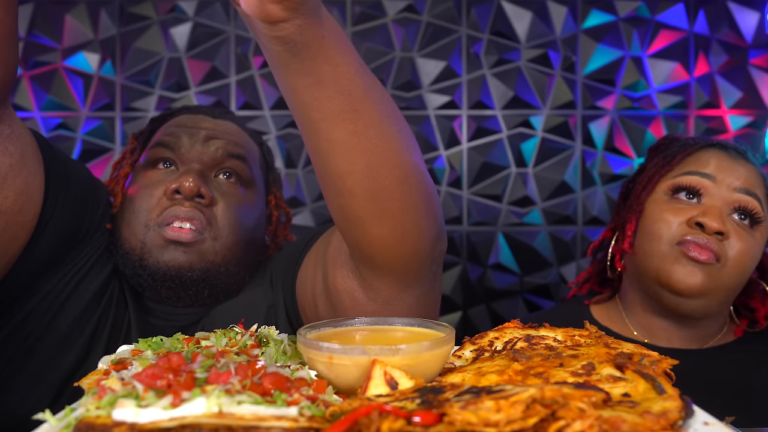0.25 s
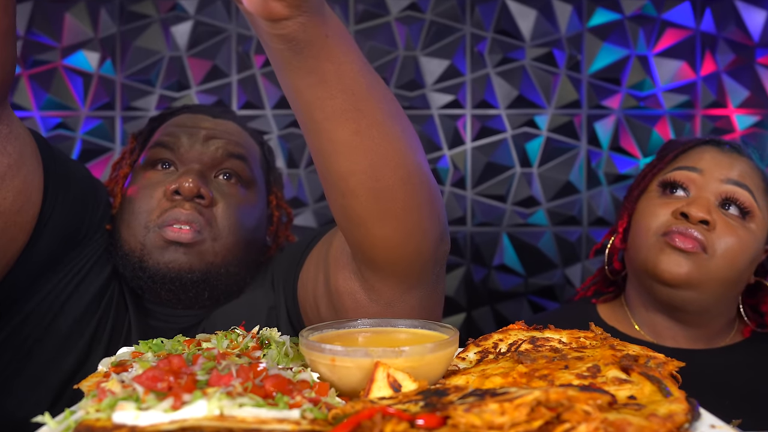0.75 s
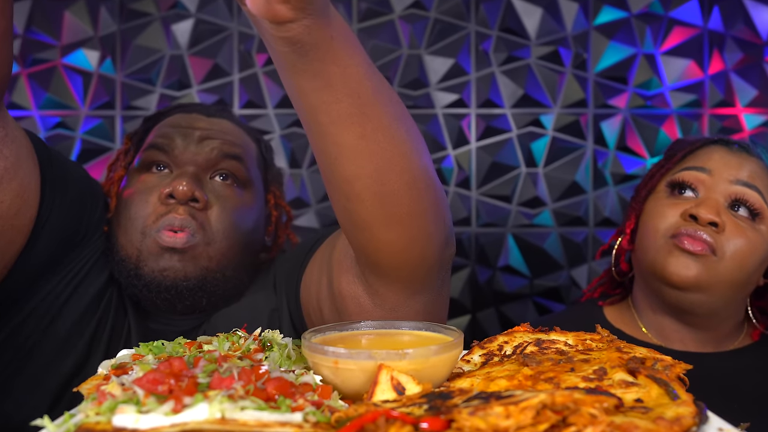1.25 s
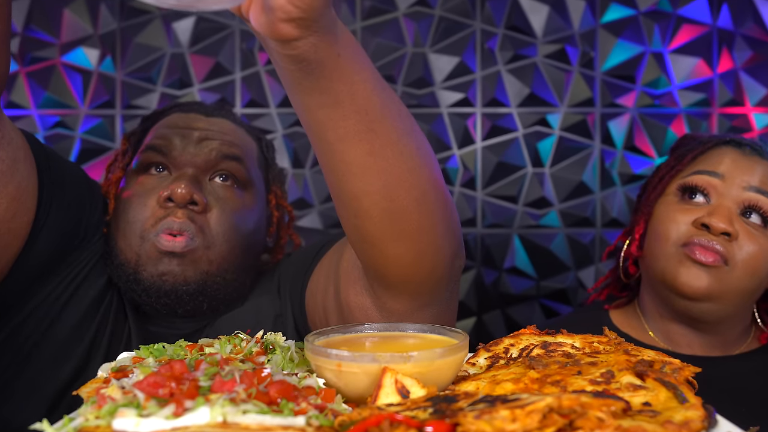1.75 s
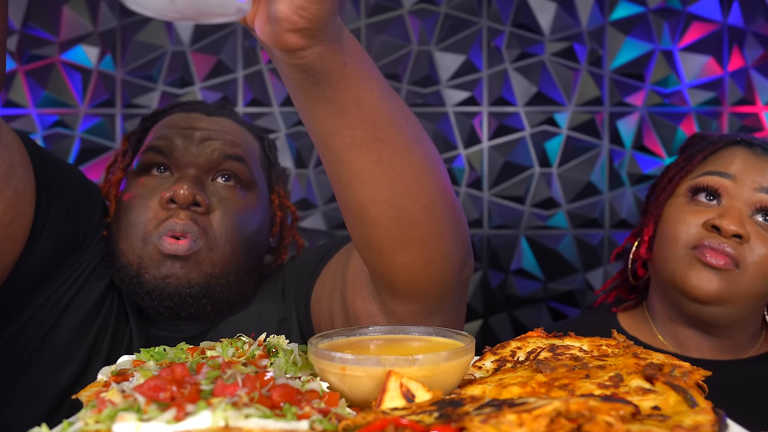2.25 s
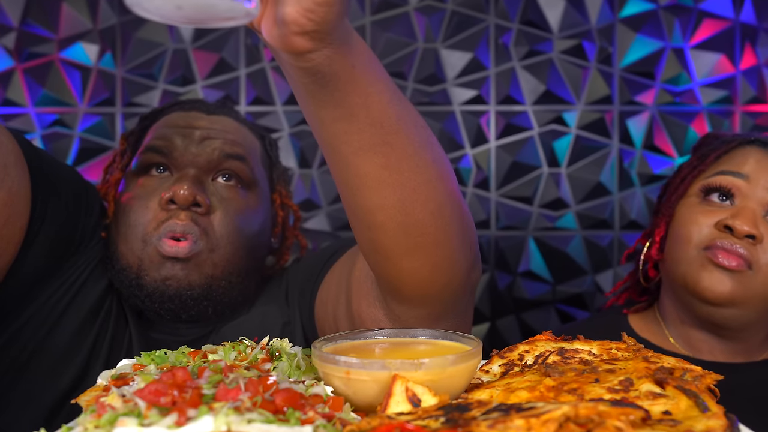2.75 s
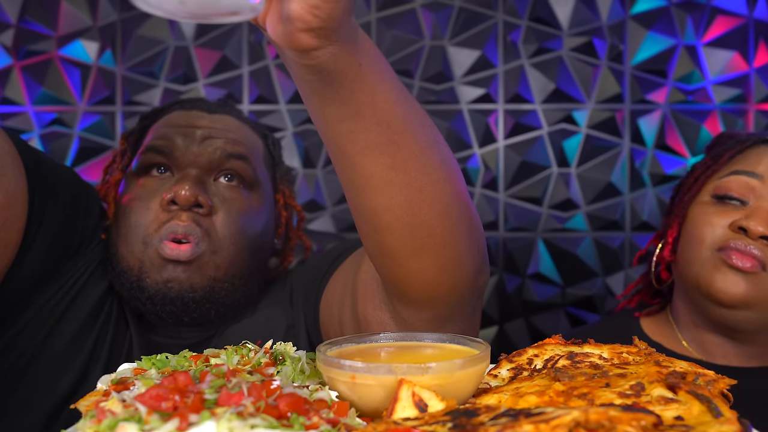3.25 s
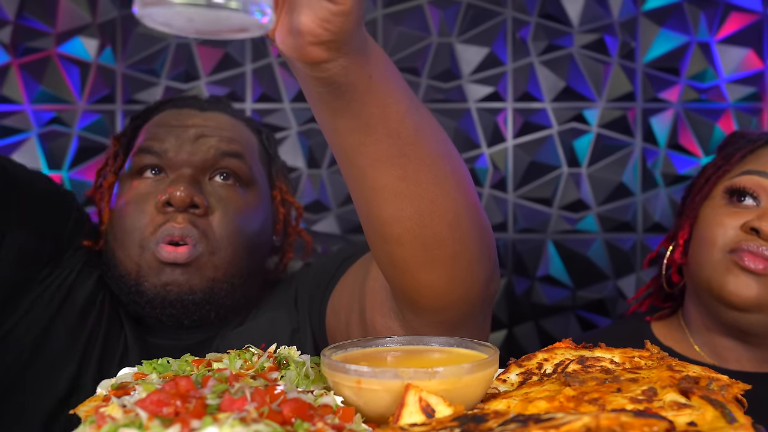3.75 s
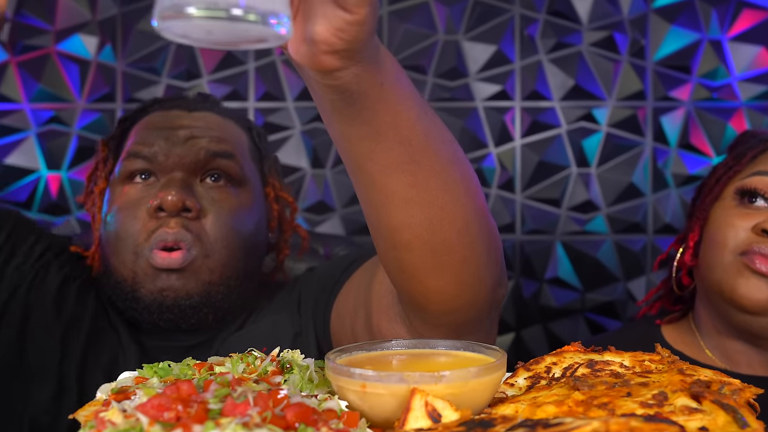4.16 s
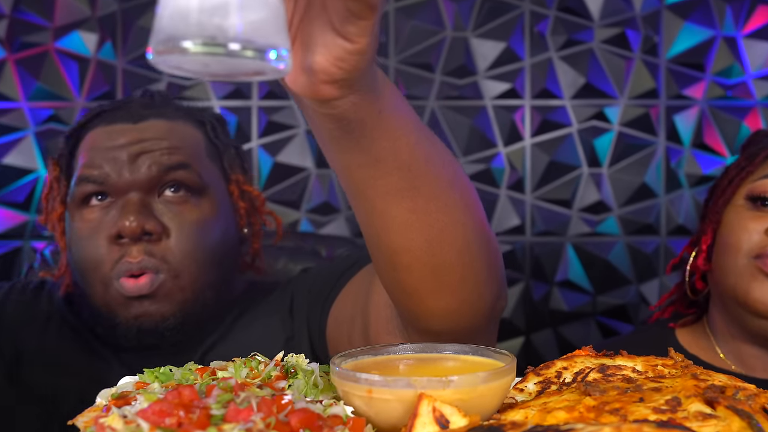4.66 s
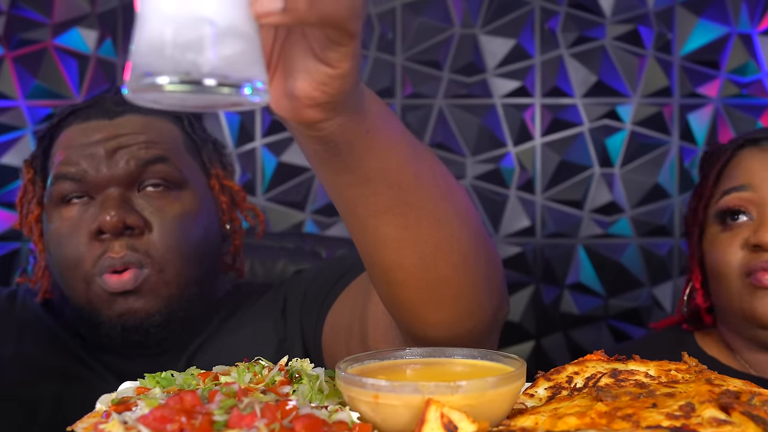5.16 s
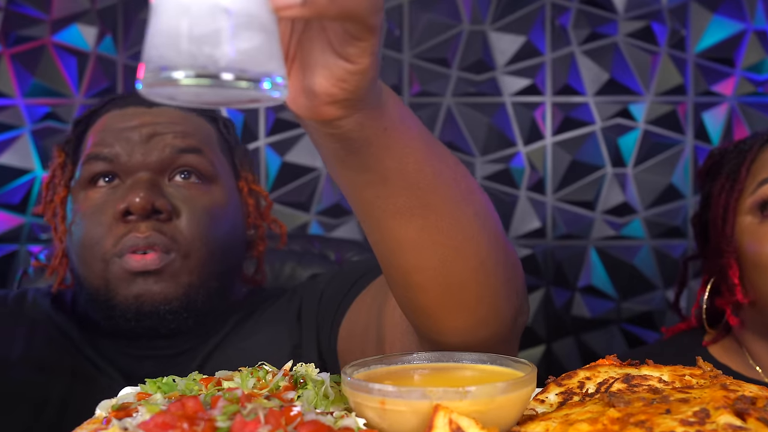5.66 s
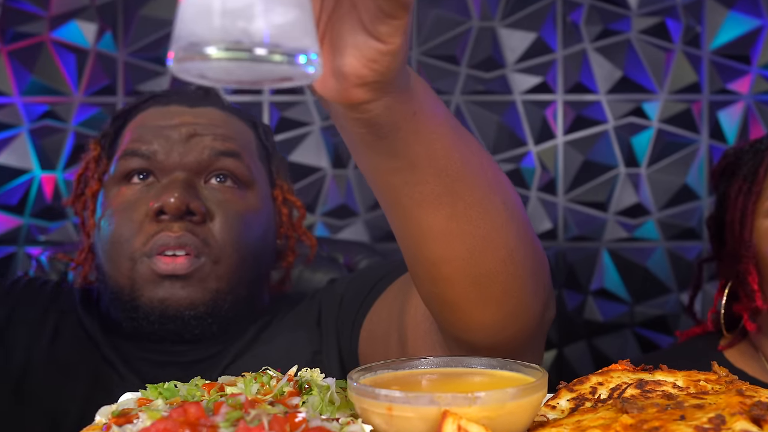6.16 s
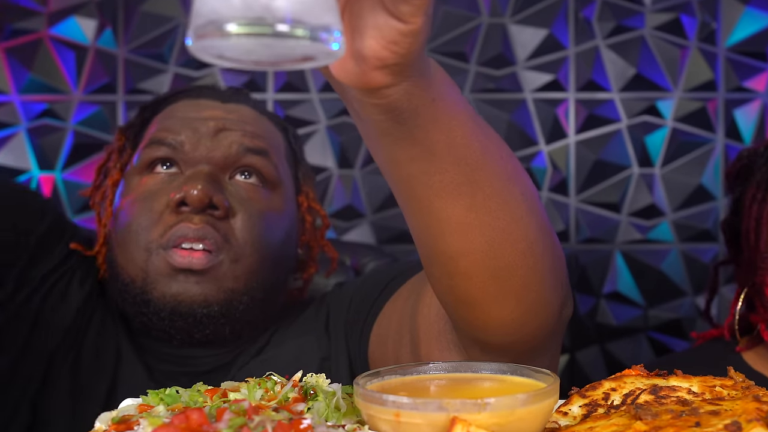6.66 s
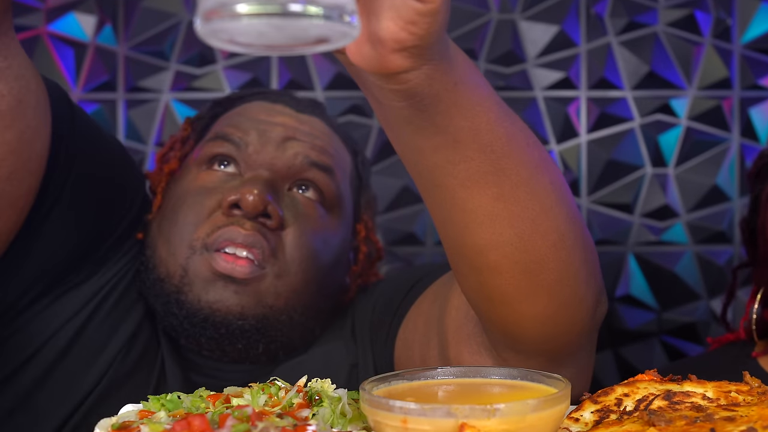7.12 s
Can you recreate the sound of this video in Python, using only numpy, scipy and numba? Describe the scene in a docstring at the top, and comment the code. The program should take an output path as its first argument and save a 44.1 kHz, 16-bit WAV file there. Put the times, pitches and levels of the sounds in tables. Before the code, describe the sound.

A carbonated drink fizzes over ice in a glass, heard very close and dry in a small room with faint low hum. Bright, dense hiss and crackle begin at once, with a tiny slosh and several ice ticks in the first 0.15 s. The fizz dips briefly, then swells back by 0.4 s; a crisp ice snap comes at 0.55 s. Soft low hand bumps cluster from 1.4 to 2.0 s. Around 3.2 to 3.6 s trapped bubbles glug with rising pitch, ending in a short ice clink. The bubbling gradually coarsens, its hollow tone rising until 4.5 s, then sinking. At 5.27 s a hard, sharp knock cracks and rings the glass, with quick rebounds, a dull shudder and low glugs near 5.4 to 5.5 s. Slightly softer fizz continues, with a faint tick at 6.95 s and a small slosh from about 7.2 s to the end at 7.4 s.

```python
"""Fizzy drink over ice.

A drink foams in a glass close to one microphone in a small room: thousands of bubble bursts a second
excite a fine spray, a bubble chorus that sinks in pitch and an air column that rises, then sinks back.
Damped sines make ice ticks, a clink, hand bumps and large-bubble glugs; liquid churns in low noise.
One hard knock rings the glass modes, with softer rebounds, a noise crack and a dull shudder."""
import sys
import numpy as np
from scipy import signal
from scipy.fft import rfft, irfft, next_fast_len
from scipy.io import wavfile
from scipy.ndimage import uniform_filter1d
from numba import njit

SR = 44100
rng = np.random.default_rng(int(sys.argv[2]) if len(sys.argv) > 2 else 0)


def int16_out(signal):
    """Quantize to a 16-bit WAV file."""
    q = np.round(np.clip(np.atleast_2d(signal).T, -1, 1) * 32767)
    wavfile.write(sys.argv[1], SR, q.astype(np.int16))


N = 325899
TIME = np.arange(N) / SR


def undb(db):
    """Decibels to amplitude gain."""
    return 10 ** (np.asarray(db) / 20)


def unit(x):
    """Scale to rms 1."""
    return x / np.sqrt(np.mean(x ** 2))


def curve(rows):
    """Join (time_s, level_db) points by straight lines over the scene."""
    time_s, level_db = np.transpose(rows)
    return np.interp(TIME, time_s, level_db)


def colour(x, points):
    """Filter by (freq_hz, gain_db) points, linear in log frequency; rms 1."""
    freq_hz, gain_db = np.transpose(points)
    size = next_fast_len(N)
    bin_hz = np.maximum(np.arange(size // 2 + 1) * SR / size, 1)
    gain = undb(np.interp(np.log(bin_hz), np.log(freq_hz), gain_db))
    return unit(irfft(rfft(x, size) * gain, size)[:N])


def walk(rate_hz):
    """Random levels held 1 / rate_hz seconds, smoothed twice; rms 1."""
    hold = max(int(SR / rate_hz), 2)
    held = np.repeat(rng.standard_normal(N // hold + 1), hold)[:N]
    return unit(uniform_filter1d(uniform_filter1d(held, hold), hold))


@njit
def resonance(x, hz, width):
    """State-variable band-pass with a moving centre; width is a share of the centre."""
    out, band_state, low_state = np.empty(len(x)), 0., 0.
    for i in range(len(x)):
        g = np.tan(np.pi * hz[i] / SR)
        v = (band_state + g * (x[i] - low_state)) / (1 + g * (g + width))
        band_state = 2 * v - band_state
        low_state = low_state + 2 * g * v
        out[i] = width * v
    return out


def band(x, hz, width, order=3):
    """Cascade resonances into a steep moving band; rms 1."""
    for _ in range(order):
        x = resonance(x, hz, width)
    return unit(x)


def highpass(x, hz):
    """Second-order Butterworth high-pass."""
    return signal.sosfilt(signal.butter(2, hz, "high", fs=SR, output="sos"), x)


def fade(t, t60_s):
    """Exponential decay of 60 dB in t60_s."""
    return np.exp(-np.log(1000) * t / t60_s)


def ring(hz, t60_s, glide_per_s=0):
    """One second of damped sine; pitch rises by the share glide_per_s of hz each second."""
    t = TIME[:SR]
    return np.sin(2 * np.pi * hz * t * (1 + glide_per_s * t / 2)) * fade(t, t60_s)


def modes(rows):
    """Sum damped sines from (freq_hz, level_db, t60_s) rows."""
    return sum(undb(db) * ring(hz, t60_s) for hz, db, t60_s in rows)


def add(out, start_s, sound):
    """Mix a sound in at start_s."""
    i = max(int(start_s * SR), 0)
    out[i:i + len(sound)] += sound[:N - i]


def swells(rows):
    """Sum Gaussian gain swells from (peak_s, half_length_s, level_db) rows."""
    return sum(undb(db) * np.exp(-((TIME - peak_s) / half_s) ** 2) for peak_s, half_s, db in rows)


def bursts(rate_per_s, spread_db):
    """Random impulses of either sign; exponential dB sizes, a negative spread makes a few weaker; rms 1."""
    happens = rng.random(N) < rate_per_s / SR
    size = undb(spread_db * np.minimum(rng.exponential(size=N), 5))
    return unit(happens * size * rng.choice([-1, 1], N))


def bubbles(rate_per_s, spread_db, count=9):
    """Bubbles of several sizes; each size bursts on its own and rings briefly at its pitch."""
    pitches_hz = np.geomspace(600, 14000, count)
    return sum(resonance(bursts(rate_per_s, spread_db), np.full(N, hz), 0.58) for hz in pitches_hz)


def room(air_db=-60, hum_db=1.5):
    """Sines wavering in phase and level make a faint hum over low room noise."""
    # hum partials, before hum_db: freq_hz, level_db
    partials = [(53.8, -75.5), (118.4, -68), (156.1, -72), (209.9, -65.5)]
    # room noise spectrum: freq_hz, gain_db
    air_colour = [(20, -20), (50, -8), (75, -14), (130, 0), (220, 0.5), (330, 3), (450, -3.5), (800, -26),
                  (3000, -49)]
    hum = np.zeros(N)
    for hz, db in partials:
        phase_rad = 2 * np.pi * hz * TIME + 1.96 * walk(7.6)
        hum += undb(db) * unit(np.sin(phase_rad) * undb(2.2 * walk(8.3)))
    return undb(hum_db) * hum + undb(air_db) * colour(rng.standard_normal(N), air_colour)


def churn(steady_db=-60.5):
    """Liquid moving between the cubes: low irregular plops, louder in each slosh."""
    # sloshes under the ice: peak_s, half_length_s, level_db
    sloshes = [(0.01, 0.03, -49), (1.4, 0.6, -73), (7.2, 0.28, -52.5), (7.33, .025, -45.5)]
    # plop spectrum: freq_hz, gain_db
    plop_colour = [(60, -16), (140, -3.5), (250, -1.5), (450, -9.5), (800, -5), (1500, -5), (4000, -47)]
    motion = undb(steady_db) + swells(sloshes)
    return colour(bursts(700, spread_db=0.5), plop_colour) * motion


def bumps(thud_hz=105, thud_t60_s=0.027, thud_db=-5):
    """Hand on the glass: a soft push, then the short low thud of the held glass."""
    # hand bumps: start_s, level_db, contact_s
    pushes = [(0.0602, -38, 0.0014), (0.123, -45, 0.0011), (1.4353, -36, 0.0032), (1.5845, -33, 0.0027),
              (1.614, -31, 0.0029), (1.633, -40, 0.0051), (1.6774, -33, 0.0029), (1.731, -39, 0.0018),
              (2.005, -33, 0.0016), (3.212, -44, .003)]
    out = np.zeros(N)
    for start_s, db, contact_s in pushes:
        add(out, start_s, undb(db) * np.hanning(int(contact_s * SR) + 3))
        add(out, start_s + contact_s, -undb(db + thud_db) * ring(thud_hz, thud_t60_s))
    return out


def glugs(swell_s=0.0038):
    """Trapped air breaks loose and rings higher as it nears the surface."""
    # large bubbles: start_s, level_db, pitch_hz, t60_s
    large_bubbles = [(3.212, -29, 426, 0.19), (3.29, -41, 463, 0.18), (3.474, -38, 545, 0.064),
                     (3.595, -25, 560, 0.065), (5.386, -36, 320, 0.14), (5.436, -31, 396, 0.54),
                     (5.528, -30, 239, 0.18)]
    onset = 1 - np.exp(-TIME[:SR] / swell_s)
    out = np.zeros(N)
    for start_s, db, hz, t60_s in large_bubbles:
        add(out, start_s, undb(db) * ring(hz, t60_s, glide_per_s=0.65) * onset)
    return out


def ice(snap_t60_s=0.006, splinter_db=-22.0, splinter_t60_s=0.025):
    """Cubes tick and snap as they crack and shift; one clinks with a splintery noise edge."""
    # ice ticks: start_s, level_db, pitch_hz, t60_s, snap_db (before the snap's high-pass)
    ticks = [(.060, -36, 420, .01, -50), (0.086, -29, 1160, 0.032, -44), (0.1228, -19.5, 1150, 0.0058, -35),
             (0.1237, -20.5, 2130, 0.009, -45), (0.1312, -28, 1400, .004, -40),
             (0.5523, -25.5, 1330, 0.011, -21), (3.399, -34, 600, 0.0086, -50),
             (6.953, -36, 350, 0.011, -42)]
    # modes of one cube, before clink_db and high-pass: freq_hz, level_db, t60_s
    cube_modes = [(1050, -29, 0.011), (1583, 0, 0.056), (1780, -1, 0.032), (1900, -19, 0.026),
                  (2440, -2, 0.05), (4000, -13, 0.088)]
    clink_s, clink_db = 3.5952, -21
    out = np.zeros(N)
    for start_s, db, hz, t60_s, snap_db in ticks:
        noise = rng.standard_normal(SR) * fade(TIME[:SR], snap_t60_s)
        snap = undb(snap_db) * highpass(noise, hz=3000)
        add(out, start_s, undb(db) * ring(hz, t60_s) + snap)
    # a cube is too small to radiate bass
    add(out, clink_s, undb(clink_db) * highpass(modes(cube_modes), hz=600))
    splinter = band(rng.standard_normal(N), np.full(N, 2000.), 1.3) * fade(TIME, splinter_t60_s)
    add(out, clink_s, undb(splinter_db) * splinter)
    return out


def knock(crack_db=-22, crack_t60_s=0.29, sing_db=-36, sing_t60_s=0.25):
    """A hard blow and softer rebounds ring the glass; a dense crack and a dull shudder go with them."""
    # glass and what holds it, before blow level and high-pass: freq_hz, level_db, t60_s
    glass_modes = [(113, -24, 0.47), (154.4, -3.5, 1), (216.7, 0.5, 0.46), (227.5, -2.5, 0.2),
                   (296, -2, 0.25), (328, -13, .3), (369, -7, 0.31), (393, 3.5, 0.24), (410, 1.5, 0.31),
                   (495, 0, 0.1), (531, 3, 0.19), (598, -2, 0.46), (717, -9, 0.3), (812, 3.5, 0.05),
                   (1000, -14, 0.15), (1420, -4.5, 0.083), (1825, -15, .12), (2940, -16, .08),
                   (3260, -19, 0.33), (3500, -13, 0.16)]
    # blow and rebounds: start_s, level_db, contact_s
    blows = [(5.2677, -23, 0.00013), (5.2749, -29.5, 0.0025), (5.3017, -29.5, 0.00069), (5.342, -45, .0002),
             (5.442, -44, .0004), (5.473, -41, 0.00096), (5.538, -42, 0.0014)]
    # crack spectrum: freq_hz, gain_db
    crack_colour = [(40, -22), (100, -8), (220, 10.5), (550, -1), (900, -8), (1400, -16), (2200, -16),
                    (3300, -8), (4100, -33), (6500, -18.5), (9000, -54)]
    # later swells of the shudder: peak_s, half_length_s, level_db
    shudder_swells = [(5.505, .06, -41), (5.72, .04, -56)]
    # shudder spectrum: freq_hz, gain_db
    shudder_colour = [(25, -4), (80, -18), (160, -18), (250, -3), (320, -0.5), (420, -0.5), (620, -5),
                      (760, -14), (1100, -18), (2500, -23.5), (6000, -58)]
    shudder_db, shudder_attack_s, shudder_t60_s = -27.5, .006, 1.11

    body, out = highpass(modes(glass_modes), hz=172), np.zeros(N)
    for start_s, db, contact_s in blows:
        push = np.hanning(int(contact_s * SR) + 3)  # a longer contact is duller
        add(out, start_s, undb(db) * np.convolve(body, push / push.sum()))

    knock_s = blows[0][0]
    crack = undb(crack_db) * colour(rng.standard_normal(N), crack_colour) * fade(TIME, crack_t60_s)
    # crowded high modes
    sing = band(rng.standard_normal(N), np.full(N, 3200.), 0.33) * fade(TIME, sing_t60_s)
    add(out, knock_s, crack + undb(sing_db) * sing)

    age_s = np.maximum(TIME - knock_s, 0)
    dying = undb(shudder_db) * (1 - np.exp(-age_s / shudder_attack_s)) * fade(age_s, shudder_t60_s)
    shudder = colour(rng.standard_normal(N), shudder_colour) * (dying + swells(shudder_swells))
    return out + shudder


def fizz(crackle_db=-10.5):
    """Bubble bursts heard as spray, lone crackles, a coarsening chorus and the air column over the foam."""
    # how hard the drink foams: time_s, level_db
    foaming = [(0, 1), (.18, -5), (.34, -6), (.43, -.5), (1.15, 0.5), (2.4, -0.5), (3.6, 1.5), (4.5, .3),
               (5.0, -2.5), (6.3, -2), (7.39, -1.5)]
    # level of the finest treble: time_s, level_db
    spray_level = [(0, -43), (2.3, -43), (3.6, -42.5), (5.4, -44), (6.4, -41.5), (7.39, -41.5)]
    # spectrum of the finest bursts: freq_hz, gain_db
    spray_colour = [(300, -2.5), (600, -5.5), (850, -1), (1500, 2), (3000, 4), (5000, 0), (6800, 1.5),
                    (8000, 0.5), (9000, 2), (10500, 0), (12000, 1.5), (15000, -2), (16000, -1)]
    # start levels at a foaming of 0 dB; ageing foam sings less and the air column takes over
    chorus_start_db, chorus_fade_db_per_s = -41, 1.0
    column_start_db, column_grow_db_per_s = -47.5, 0.2742
    # the typical bubble grows, so its pitch sinks
    fresh_bubble_hz, coarsen_oct_per_s = 4460, 0.12
    # rising foam shortens the air column, then the head sinks back
    column_start_hz, rise_hz_per_s, foam_peak_s, sink_hz_per_s = 1216, 207, 4.5, 160

    foaming_db, spray_db = curve(foaming), curve(spray_level)
    chorus_db = chorus_start_db + foaming_db - chorus_fade_db_per_s * TIME
    column_db = column_start_db + foaming_db + column_grow_db_per_s * TIME
    bubble_hz = fresh_bubble_hz * 2 ** (-coarsen_oct_per_s * TIME)
    rise_hz = rise_hz_per_s * np.minimum(TIME, foam_peak_s)
    sink_hz = sink_hz_per_s * np.maximum(TIME - foam_peak_s, 0)
    column_hz = column_start_hz + rise_hz - sink_hz
    rate_per_s = 15000 * np.exp(-TIME / 8)  # the foam slowly spends its gas

    spray = colour(bubbles(.55 * rate_per_s, spread_db=2.5), spray_colour)
    spray = spray * undb(spray_db + 0.33 * walk(25.3))
    crackle = colour(bursts(350, spread_db=-0.5), spray_colour) * undb(spray_db + crackle_db)
    chorus = band(bursts(rate_per_s, spread_db=2.5), bubble_hz, 1.48)
    chorus = chorus * undb(chorus_db + 0.45 * walk(18))
    column = band(bursts(rate_per_s, spread_db=2.5), column_hz, 0.82)
    column = column * undb(column_db + .5 * walk(15))
    return spray + crackle + chorus + column


def scene():
    """One microphone feeds both channels."""
    mono = room() + churn() + bumps() + glugs() + ice() + knock() + fizz()
    return np.array([mono, mono])


def record(dry, low_hz=36, top_hz=15750):
    """The microphone sheds the deepest bass and the recorder cuts the top steeply."""
    top_cut = signal.ellip(12, .1, 80, top_hz, fs=SR, output="sos")
    return signal.sosfilt(top_cut, highpass(dry, low_hz))


dry = scene()
out = record(dry)
int16_out(out)
```